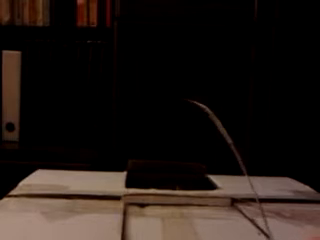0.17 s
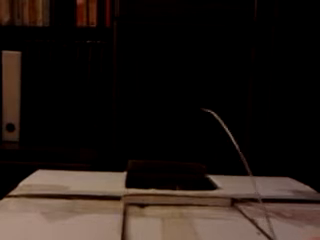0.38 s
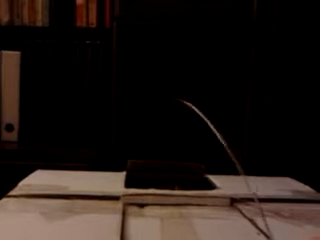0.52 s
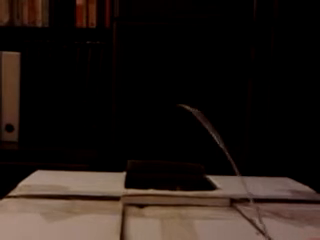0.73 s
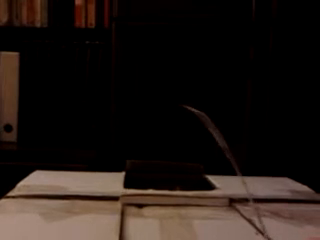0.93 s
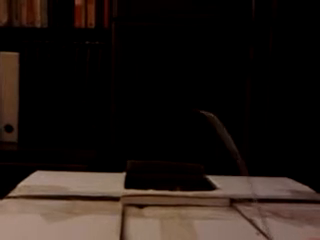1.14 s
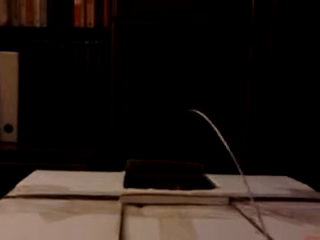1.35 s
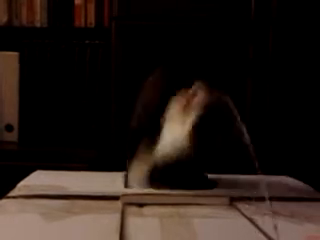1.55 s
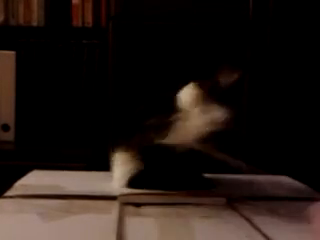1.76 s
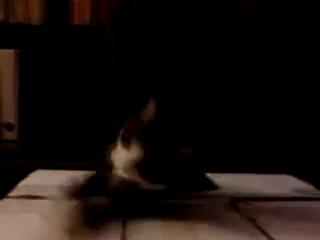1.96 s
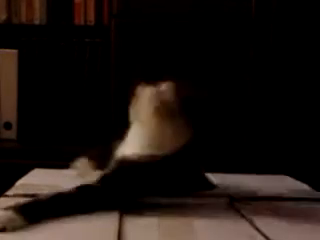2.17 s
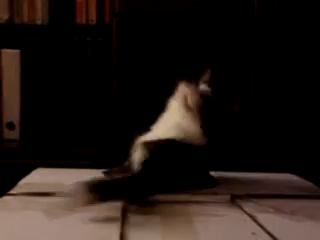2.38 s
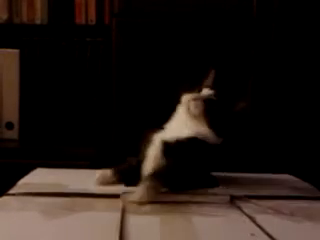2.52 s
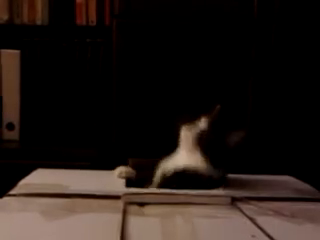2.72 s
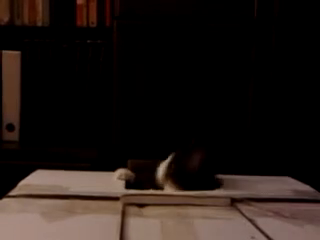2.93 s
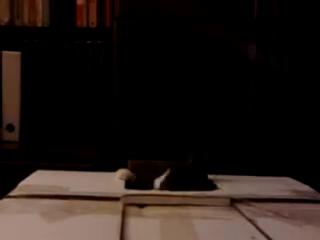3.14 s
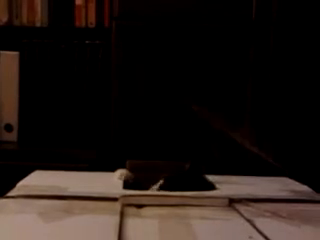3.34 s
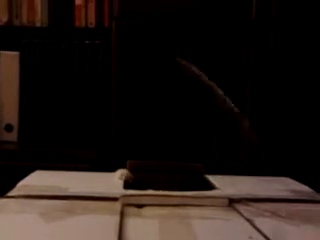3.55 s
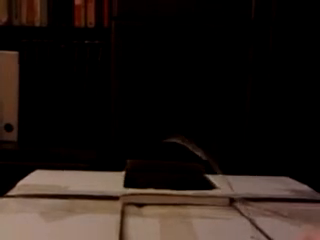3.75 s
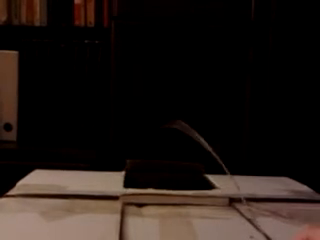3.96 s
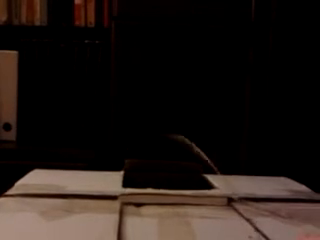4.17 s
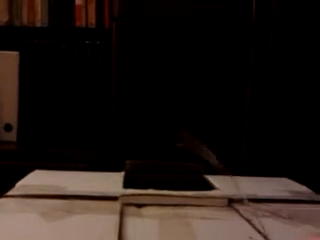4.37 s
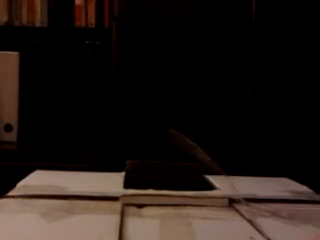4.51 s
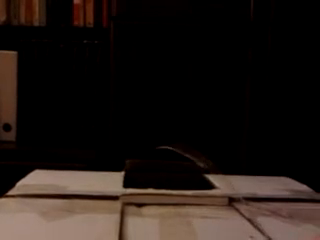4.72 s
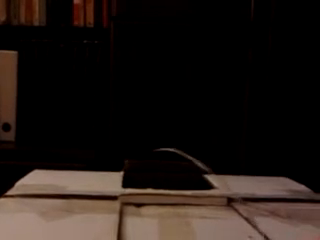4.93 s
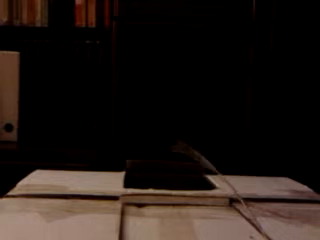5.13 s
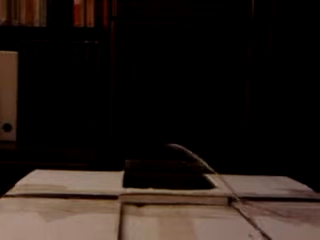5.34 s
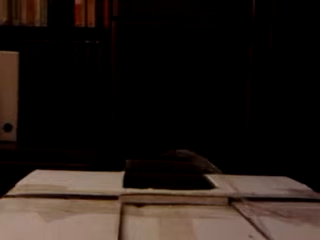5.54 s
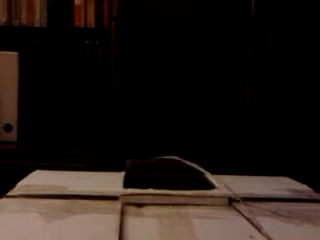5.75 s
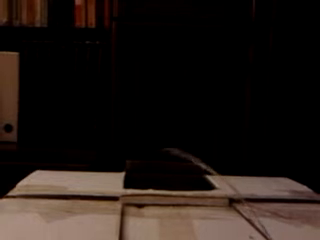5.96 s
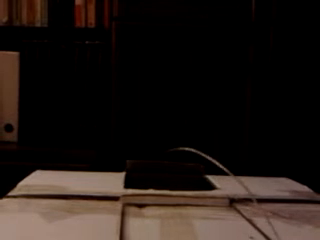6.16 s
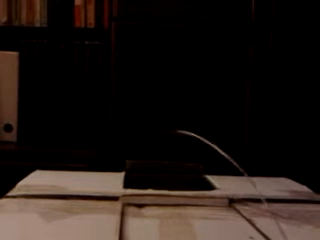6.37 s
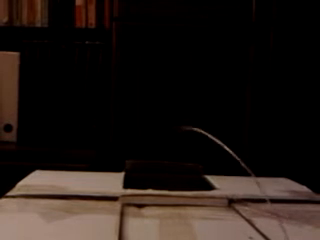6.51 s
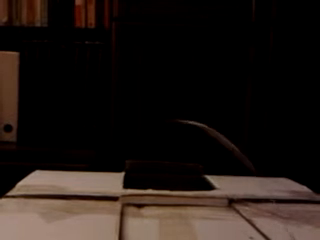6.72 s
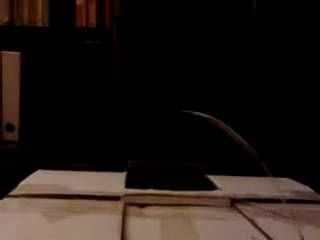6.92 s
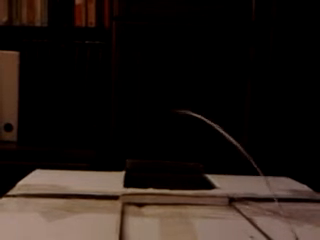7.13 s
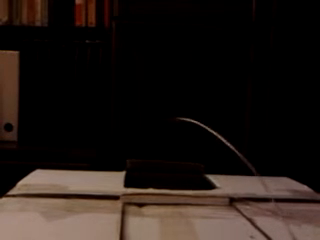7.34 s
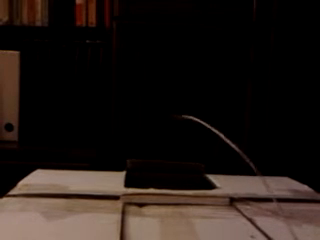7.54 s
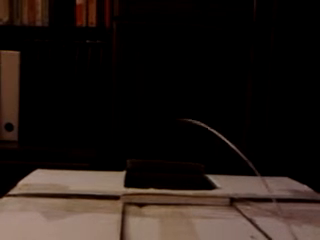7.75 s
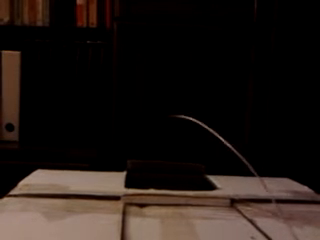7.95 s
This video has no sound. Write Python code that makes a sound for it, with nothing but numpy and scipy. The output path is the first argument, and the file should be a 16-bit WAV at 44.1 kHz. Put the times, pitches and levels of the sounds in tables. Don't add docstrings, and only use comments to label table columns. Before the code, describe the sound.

Quiet hissy room, a sudden heavy cardboard boom with sharp knock and claw scratch, quick rattling scrabble, then sparse muffled taps inside the box.

```python
import sys
import numpy as np
from scipy import signal
from scipy.fft import rfft, irfft, next_fast_len
from scipy.io import wavfile
from scipy.ndimage import map_coordinates

SR = 44100
rng = np.random.default_rng(int(sys.argv[2]) if len(sys.argv) > 2 else 0)


def makeup_ratio(level_db):
    decades = np.asarray(level_db, float) / 20
    return 10 ** decades


def wrap_up_sound(samples):
    columns = np.atleast_2d(samples).T
    tamed = np.clip(columns, -1, 1)
    steps = np.round(tamed * 32767).astype(np.int16)
    wavfile.write(sys.argv[1], SR, steps)


N = 352359

# frequency in Hz, level in dB, t60 in seconds.
FLAP_MODES = [(476, -18.5, 0.042), (553, -19.5, 0.029), (660, 11.5, 0.044), (789, 12, 0.022),
              (977, 18, 0.022), (1170, 1, 0.026), (1395, 4.5, 0.042), (1800, -14.5, .02)]


def unit(x):
    return x / np.sqrt(np.mean(x ** 2) + 1e-20)


def peak(x):
    return x / np.max(np.abs(x))


def like(x, model):
    return x * np.linalg.norm(model) / np.linalg.norm(x)


def along(points, hz):
    point_hz, values = np.transpose(points)
    return np.interp(np.log(hz + 1), np.log(point_hz + 1), values)


def coloured(x, spectrum, tilt_db=0):
    size = next_fast_len(len(x))
    hz = np.fft.rfftfreq(size, 1 / SR)
    gain = makeup_ratio(along(spectrum, hz) + tilt_db * np.log2((hz + 600) / 5000))
    return irfft(rfft(x, size) * gain, size)[:len(x)]


def noise(spectrum, size):
    return unit(coloured(rng.standard_normal(size), spectrum))


def wobble(rate_hz):
    knots = rng.standard_normal(int(N * rate_hz / SR) + 4)
    return map_coordinates(knots, [np.arange(N) * rate_hz / SR])


def ring(modes, t):
    hz, db, t60 = np.transpose(modes)[:, :, None]
    level_shift, pitch_shift = rng.standard_normal((2, len(modes), 1))
    decay = makeup_ratio(db + 2.4 * level_shift - 60 * t / t60)
    return np.sum(decay * np.sin(2 * np.pi * hz * (1 + 0.013 * pitch_shift) * t), axis=0)


def echo(size):
    # frequency in Hz, t60 in seconds.
    room_t60 = [(60, 0.74), (200, 0.26), (700, 0.73), (2000, 0.57), (5000, 0.48), (13000, 0.18)]
    hz, t, z = signal.stft(rng.standard_normal(size), SR, nperseg=256)
    decay = makeup_ratio(-60 * t / along(room_t60, hz)[:, None])
    tail = signal.istft(z * decay, SR, nperseg=256)[1][:size]
    return tail / np.linalg.norm(tail)


def paws(contacts, small_modes, damping_db_s, tilt_db, wet_db, claw_wet_db):
    # frequency in Hz, level in dB, t60 in seconds.
    panel_modes = [(100, -26.5, .09), (175, -0.5, 0.36), (217.4, 1, 0.37), (231, -4, 0.26),
                   (300, -5.5, 0.11), (335, 4.5, 0.082), (400, -27, 0.029)]
    # frequency in Hz, level in dB per Hz.
    claw_spectrum = [(250, -18), (1200, -2.5), (2400, 2.5), (3000, -0.5), (5500, -3.5), (9000, -6.5),
                     (12000, -13.5), (16000, -15)]
    tilt_per_lead_db = -0.43
    out, t = np.zeros(N + SR), np.arange(SR // 4) / SR
    blur = makeup_ratio(-60 * t / 0.1)
    for start_s, thud_db, knock_db, claw_db, contact_s in contacts:
        bright_db = tilt_db + tilt_per_lead_db * (claw_db - knock_db)
        press = np.exp(-t / np.clip(contact_s, .0003, .05))
        push = press[:SR // 10] * rng.standard_normal((2, SR // 10)) ** 3
        push[:, 0] = -15.5
        panels = ring(panel_modes, t) * makeup_ratio(-damping_db_s * t)
        flaps = ring(small_modes, t)
        thud = makeup_ratio(thud_db) * peak(signal.fftconvolve(panels, push[0])[:len(t)])
        knock = makeup_ratio(knock_db) * peak(signal.fftconvolve(flaps, push[1])[:len(t)])
        scratch = coloured(rng.standard_normal(len(t)), claw_spectrum, bright_db)
        claw = makeup_ratio(claw_db) * peak(scratch * press)
        tail = echo(size=SR // 2)
        far_thud = like(panels * blur, thud)
        far_knock = makeup_ratio(-1) * like(np.cumsum(flaps * blur) * blur, knock)
        boom = signal.fftconvolve(far_thud + far_knock, tail)[:len(tail)]
        far_claw = like(coloured(tail, claw_spectrum, bright_db + 2.0), claw)
        far = makeup_ratio(wet_db) * boom + makeup_ratio(claw_wet_db) * far_claw
        at = round(start_s * SR)
        out[at:at + len(t)] += thud + knock + claw
        out[at + SR // 200:][:len(far)] += far
    return out[:N]


def pounce():
    # start in seconds, thud, knock and claw peaks in dB, contact time in seconds.
    contacts = [
        (1.5605, -47, -33, -49, .001),
        (1.5765, -5, -10, -45, .006),
        (1.5805, -18.5, -3.5, -4, .0042),
        (1.5915, -4.5, -10.5, -10, 0.0028),
        (1.611, -14, -16.5, -37, .023),
    ]
    return paws(contacts, FLAP_MODES, damping_db_s=61, tilt_db=2.5, wet_db=-2.5, claw_wet_db=-2.0)


def scrabble():
    # start in seconds, thud, knock and claw peaks in dB, contact time in seconds.
    pad_contacts = [(1.409, -42, -43.5, -56, 0.0062), (1.416, -29.5, -35.5, -51, 0.012),
                    (1.428, -32, -39, -44.5, 0.02), (1.983, -37, -27.5, -22, 0.0042),
                    (1.993, -26, -33, -31, 0.013), (2.08, -34, -30, -26.5, 0.0043),
                    (2.204, -41, -33, -31.5, .008), (2.251, -24, -22, -26, 0.0087),
                    (2.261, -30, -24.5, -39, 0.0025), (2.324, -50, -45, -46, 0.0082),
                    (2.339, -36, -30, -40, 0.0041), (2.527, -65, -36, -35, .0095),
                    (2.614, -35.5, -43, -43, 0.014), (2.644, -37, -33.5, -44, 0.01),
                    (2.728, -36, -26, -34, 0.011)]
    # start in seconds, thud, knock and claw peaks in dB, contact time in seconds.
    claw_contacts = [(1.4745, -50, -38, -39, .003), (1.527, -36, -36, -35, 0.003),
                     (1.9772, -28.5, -26, -21.5, .006), (2.0196, -32, -43, -32, 0.0022),
                     (2.0504, -32.5, -33, -23, 0.0022), (2.1281, -42, -36, -23.5, 0.0005),
                     (2.1994, -56, -57, -24.5, .00092), (2.3018, -47, -35, -27.5, 0.0034),
                     (2.3283, -41, -42, -29, .0017), (2.436, -37, -30.5, -39, 0.0035),
                     (2.4918, -57, -28, -20, 0.00025), (2.4939, -62, -46, -32.5, 0.0035),
                     (2.562, -52, -51, -35.5, .0012)]
    contacts = [*pad_contacts, *claw_contacts]
    return paws(contacts, FLAP_MODES, damping_db_s=240, tilt_db=2.5, wet_db=-8.5, claw_wet_db=-2)


def shifting():
    # start in seconds, thud, knock and claw peaks in dB, contact time in seconds.
    contacts = [(.052, -49, -54, -49, 0.0093), (.36, -58, -54, -45.5, 0.0042), (3.10, -54, -50, -60, .005),
                (3.1415, -48, -29, -37.5, 0.0049), (3.733, -40, -54, -54, 0.014),
                (4.16, -46.5, -48.5, -63, 0.016), (4.598, -47.5, -50, -49, .0053),
                (4.8985, -48, -37.5, -58, 0.0033), (4.934, -41, -46, -42, 0.0064),
                (4.955, -44, -39, -49, 0.013), (5.048, -39, -43, -46, 0.0033),
                (5.06, -39, -39.5, -54, 0.0048), (5.293, -56, -43, -47, 0.0044),
                (5.7616, -59.5, -34, -29, 0.0026), (6.176, -63, -55, -43, .003),
                (7.19, -59, -60, -59, .004), (7.335, -44.5, -54, -57, .0045),
                (7.3572, -47, -35, -34, 0.0021), (7.443, -61, -53, -55, .004),
                (7.865, -50, -50, -61, 0.0055)]
    # frequency in Hz, level in dB, t60 in seconds.
    wall_modes = [(460, -15, 0.033), (625, 5, 0.13), (700, 5, 0.031), (790, 11, 0.027), (946, 10.5, 0.032),
                  (1190, -19, 0.027), (1380, -2, 0.028), (1870, -59, 0.025)]
    return paws(contacts, wall_modes, damping_db_s=120, tilt_db=-1.5, wet_db=-4.5, claw_wet_db=-9.5)


def gains(rows, column, attack_s, release_s):
    t = np.arange(0, N / SR + .002, .001)
    gain = np.zeros(len(t))
    for row in rows:
        since_s = t - row[0]
        swell = np.clip(since_s / attack_s, 0, 1) ** 2
        fade = np.exp(-np.clip(since_s - row[1], 0, None) / release_s)
        gain += makeup_ratio(row[column]) * swell * fade
    return np.interp(np.arange(N) / SR, t, gain)


def rubbing():
    # start in seconds, length in seconds, fur hiss in dB, pad scuff in dB.
    strokes = [(1.44, 0.037, -50, -52), (1.49, .08, -71, -53.5), (1.95, .04, -46, -44),
               (2.01, 0.095, -50.5, -49.5), (2.14, 0.17, -60, -53.5), (2.27, 0.089, -50.5, -47.5),
               (2.45, 0.28, -55, -56.5), (2.68, 0.1, -50.5, -55.5), (2.81, 0.25, -60, -60.5),
               (3.15, 0.066, -62, -55), (3.65, 0.051, -62, -49.5), (3.71, 0.055, -51, -55),
               (4.96, 0.13, -67, -66), (5.78, 0.061, -72.5, -57), (7.37, .08, -72, -62.5)]
    # start in seconds, length in seconds, creak in dB, rocking in dB.
    leans = [(1.46, 0.1, -51, -57), (1.67, .13, -75.5, -40.5), (1.985, .04, -38, -34),
             (2.06, 0.068, -49.5, -35.5), (2.16, 0.11, -61, -68), (2.4, 0.17, -48.5, -56),
             (2.61, 0.093, -46.5, -51), (2.76, 0.042, -57.5, -44), (2.89, 0.036, -61, -55),
             (3.72, 0.038, -51.5, -57), (3.8, 0.045, -68, -55), (4.95, .04, -55.5, -74),
             (5.05, 0.032, -60, -56), (5.77, .03, -51, -83)]
    # frequency in Hz, level in dB per Hz.
    fur_spectrum = [(2000, -34.5), (3500, -10), (5000, 0), (6500, -5), (9000, -3.5), (11500, -17),
                    (16000, -20)]
    # frequency in Hz, level in dB per Hz.
    scuff_spectrum = [(400, -36), (800, 4.5), (1050, 5), (1700, -1.5), (2500, -5.5), (4000, -7),
                      (7000, -40.5)]
    # frequency in Hz, level in dB per Hz.
    creak_spectrum = [(90, -30), (160, -1), (220, -3), (350, -17), (650, -1), (1200, -25)]
    # frequency in Hz, level in dB per Hz.
    sway_spectrum = [(15, -16.5), (35, -6.5), (60, 3), (85, -21.5), (130, -38)]
    stroke_times = dict(attack_s=.025, release_s=0.024)
    lean_times = dict(attack_s=0.02, release_s=0.041)
    clumps_db = 1.4 * wobble(45)
    fur = unit(makeup_ratio(clumps_db + 3 * wobble(600)) * noise(fur_spectrum, size=N))
    scuff = unit(makeup_ratio(clumps_db + 2.5 * wobble(300)) * noise(scuff_spectrum, size=N))
    creak = unit(makeup_ratio(clumps_db + 2 * wobble(30)) * noise(creak_spectrum, size=N))
    sway = noise(sway_spectrum, size=N)
    coat = gains(strokes, 2, **stroke_times) * fur + gains(strokes, 3, **stroke_times) * scuff
    board = gains(leans, 2, **lean_times) * creak + gains(leans, 3, **lean_times) * sway
    return coat + board


def floor():
    # frequency in Hz, level in dB per Hz.
    hiss_spectrum = [(15, 4.5), (45, 1), (110, -4), (300, -6.5), (1000, -11.5), (1500, -14), (4300, -17),
                     (5600, -11), (7000, -16.5), (10000, -18), (16000, -21)]
    # frequency in Hz, level in dB before a common 7 dB lift of the sine's peak.
    whines = [(3967, -83.5), (5550, -95), (7935, -86), (13910, -77.5)]
    hiss_db = -55
    t = np.arange(N) / SR
    whine = sum(makeup_ratio(db + 7.0) * np.sin(2 * np.pi * hz * t) for hz, db in whines)
    return makeup_ratio(hiss_db + 0.51 * wobble(0.67)) * noise(hiss_spectrum, size=N) + whine


def scene():
    return (pounce() + scrabble() + shifting() + rubbing() + floor())[None]


def band_limit(x):
    return signal.sosfilt(signal.butter(12, 16800, fs=SR, output="sos"), x)


def record(dry):
    top, knee = .8, 4
    low_cut_hz, top_hz = 32, 15730
    soft = dry / (1 + np.abs(dry / top) ** knee) ** (1 / knee)
    size = next_fast_len(N)
    hz = np.fft.rfftfreq(size, 1 / SR)
    band = (hz < top_hz) * hz ** 2 / (hz ** 2 + low_cut_hz ** 2)
    limited = irfft(rfft(soft, size) * band, size)[..., :N]
    return band_limit(limited)


dry = scene()
out = record(dry)
wrap_up_sound(out)
```